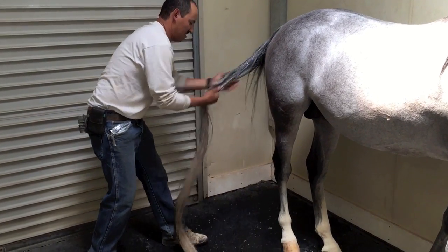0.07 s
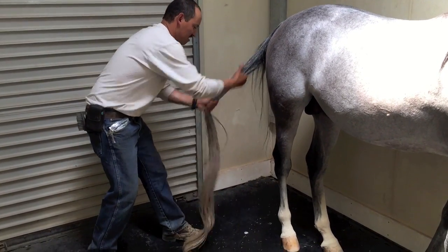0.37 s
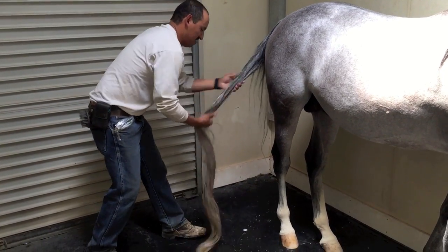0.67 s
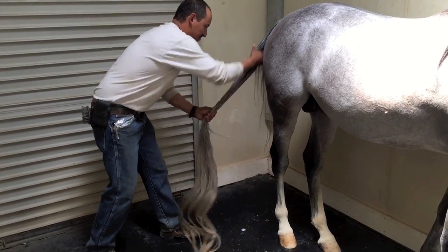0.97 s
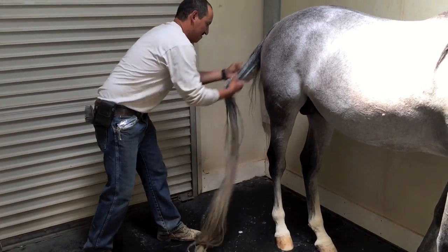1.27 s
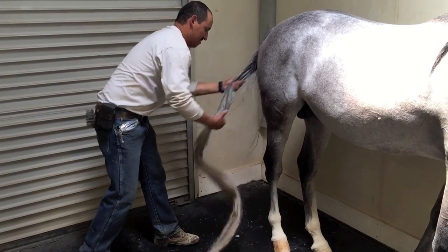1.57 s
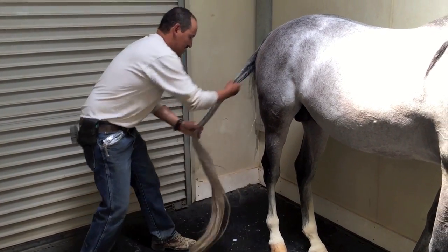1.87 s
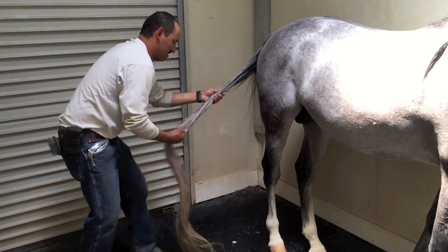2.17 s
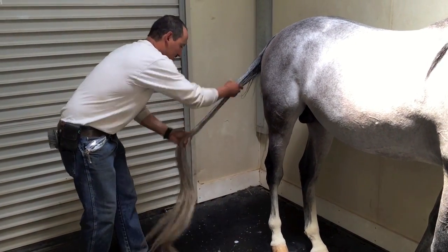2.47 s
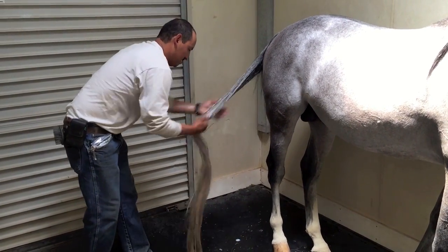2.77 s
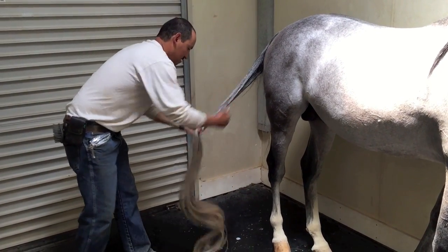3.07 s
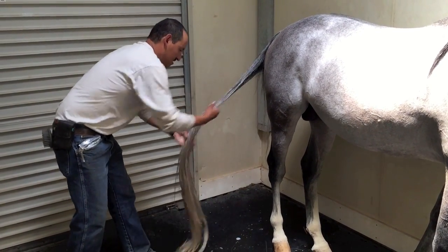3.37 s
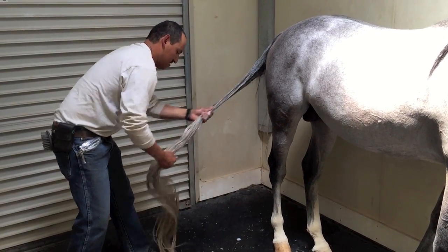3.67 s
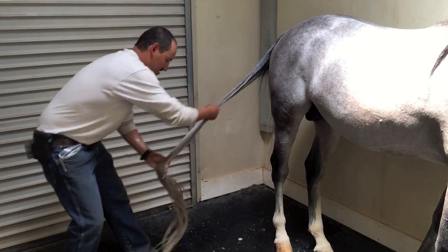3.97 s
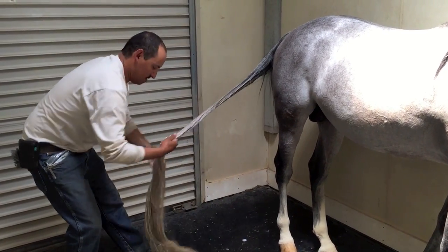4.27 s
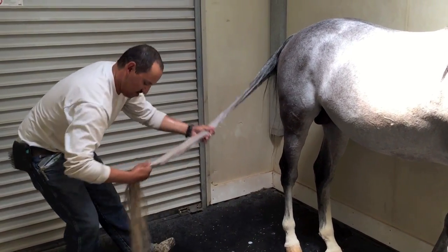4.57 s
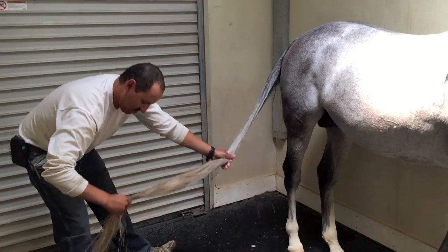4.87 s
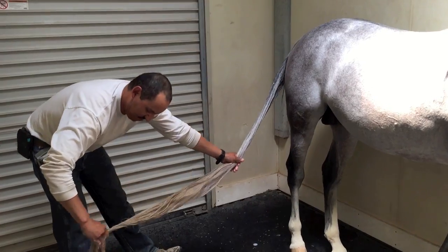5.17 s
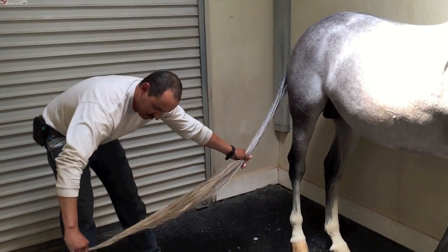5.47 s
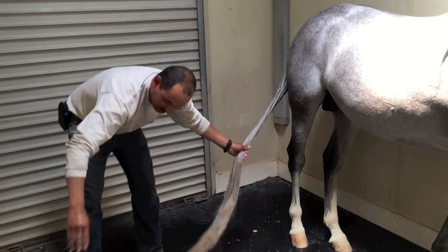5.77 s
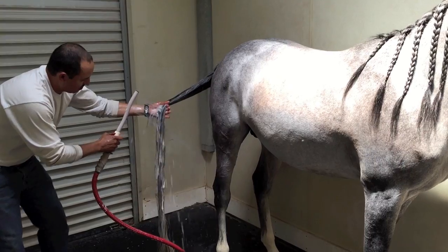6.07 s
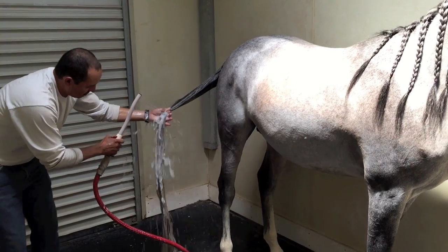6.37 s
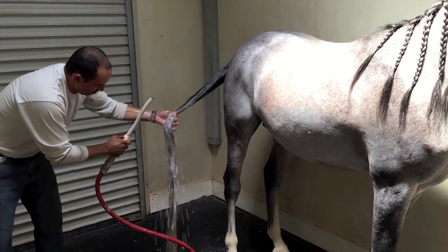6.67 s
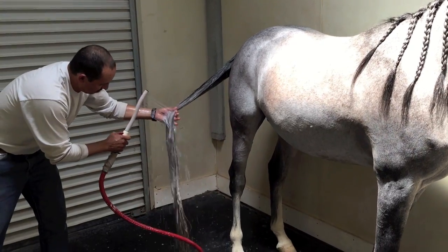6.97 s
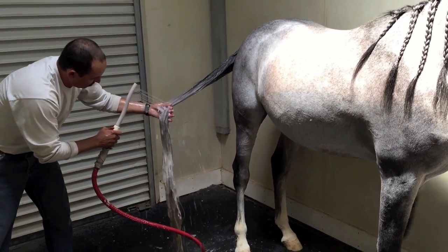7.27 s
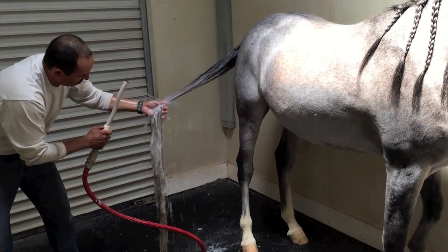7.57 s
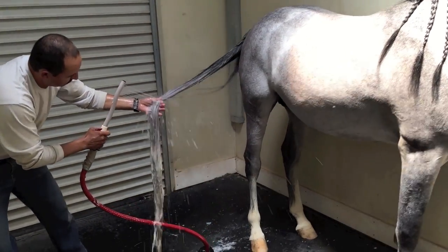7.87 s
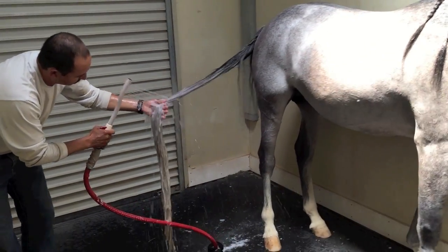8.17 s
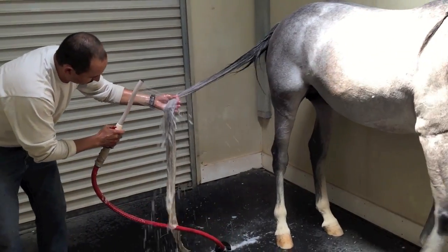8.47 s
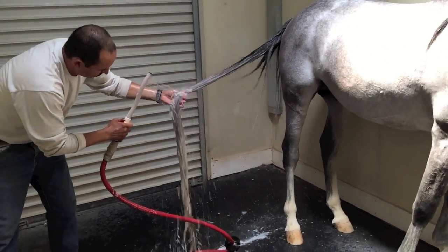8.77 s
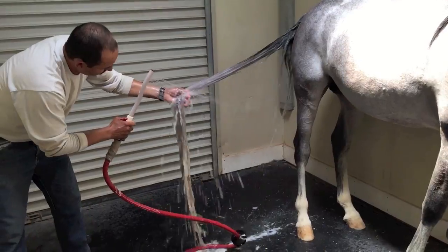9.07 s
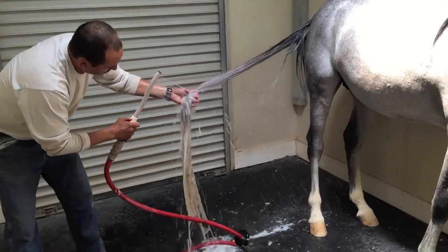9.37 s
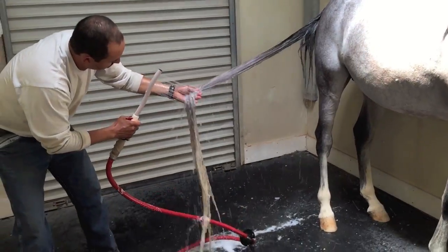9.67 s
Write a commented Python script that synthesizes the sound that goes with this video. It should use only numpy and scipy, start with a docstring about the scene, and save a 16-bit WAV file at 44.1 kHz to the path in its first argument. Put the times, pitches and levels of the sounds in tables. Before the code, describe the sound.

For the first six seconds, hands quietly strip lather down a horse's wet tail in uneven strokes, the hair rubbing and the suds squelching and crackling. Drops plink and tick now and then, most clearly near 0.6 seconds. Short squeaks of wet hair come between 1 and 1.7 seconds and again around 4.6 and 5.7. One stronger rub stands out just after 2 seconds, and suds tick onto the floor from 5 seconds. Soft bumps of shifting feet sit over a faint low barn rumble.

At 6 seconds a hose abruptly takes over, much louder. Spray hisses steadily in the hair while run-off splatters, sloshes in a puddle and drums on a rubber mat, with irregular sharp slaps, thuds and a few gurgles until the end, near 9.7 seconds. The wash stall's hard walls add a short echo; the microphone is a few steps away.

```python
"""Hands strip lather down a horse's wet tail: hair rubs and squeaks, suds squelch, drops plink and tick.
At six seconds a hose takes over: spray hisses in the hair, run-off splatters and drums on a rubber mat.
Drops, squeaks and gouts echo off the hard walls of the wash stall.
Feet and bodies shift over the low rumble of the barn. One microphone, a few steps away."""
import sys
import numpy as np
from scipy import signal
from scipy.fft import rfft, irfft, next_fast_len
from scipy.io import wavfile
from scipy.ndimage import uniform_filter1d, map_coordinates

SR = 44100
rng = np.random.default_rng(int(sys.argv[2]) if len(sys.argv) > 2 else 0)


def materialize(psi):
    """Save the field psi as 16-bit PCM at rate SR to the path in sys.argv[1].

    A 1-D psi becomes a single channel; in a 2-D psi each row is a channel.
    """
    bounded = np.clip(np.atleast_2d(psi).T, -1, 1)
    quanta = np.round(bounded * 32767).astype(np.int16)
    wavfile.write(sys.argv[1], SR, quanta)


N = 428211

# freq_hz, gain_db
HAIR_SPECTRUM = [(1000, -8), (2400, -13), (3600, 2), (5000, 3.5), (6500, 4), (9500, 1), (10400, -3),
                 (12000, -0.5), (15000, -4.5)]
SNAP_SPECTRUM = [(300, -25), (1500, -48), (3500, 27), (8000, -28), (15000, 20)]
SQUELCH_SPECTRUM = [(500, -26), (900, -8), (1400, 8.5), (2000, 7.5), (3000, 7.5), (4500, 2.5), (8000, -28)]
SCUFF_SPECTRUM = [(200, -1), (310, 3.5), (500, 3), (800, 6.5), (1150, 5.5), (1600, -53), (3000, -14)]
# freq_hz, width_hz, gain_db
FLOOR_MODES = [(314, 9.9, 6), (470, 83, 2.5), (600, 51, -2), (750, 14, 2), (1004, 9.9, 0.5)]
STOOP_START_S, STOOP_LENGTH_S = 4.86, 0.23
SUDS_DB, STOOP_SUDS_BOOST_DB = -14, 5


def lathering():
    """Each stroke rubs wet hair, bursts foam and squeezes suds out between the fingers."""
    rub_gain, squelch_gain, scuff_gain = stroke_gains()
    # thin end of the tail, near the floor: duller rub, more crackle, hollow scuff
    stooped = ramp(STOOP_START_S, STOOP_LENGTH_S)
    hair = texture(HAIR_SPECTRUM, 2500, spread_db=4, wash=0.9, ripple_db=2.6, window=512, frames=10)
    suds = coloured(patter(120, spread_db=8, wash=0), SNAP_SPECTRUM)
    rub = hair + amp(SUDS_DB + STOOP_SUDS_BOOST_DB * stooped) * suds
    dull_rub = filtered(rub, lambda hz: 1 / np.sqrt(1 + (hz / 9000) ** 4))
    rub = (1 - stooped) * rub + stooped * dull_rub
    squelch = texture(SQUELCH_SPECTRUM, 900, spread_db=0.5, wash=1, ripple_db=4, window=512, frames=6)
    wet_rub = rub_gain * rub + squelch_gain * squelch
    grit = patter(500, spread_db=4.5, wash=0.88)
    scuff = (1 - stooped) * coloured(grit, SCUFF_SPECTRUM) + stooped * resonant(grit, FLOOR_MODES)
    return amp(1.24 * wobble(45)) * wet_rub + amp(1.4 * wobble(25)) * scuff_gain * scuff


# start_s, length_s, rub_db, squelch_db, scuff_db
STROKES = [(0.08, 0.14, -50.5, -50, -61), (0.33, 0.032, -55, -57, -74), (0.461, 0.038, -56, -50.5, -84),
           (0.555, .2, -43.5, -50.5, -74), (0.833, 0.12, -53.5, -53, -81), (1.052, 0.027, -52, -54, -72),
           (1.154, 0.13, -49.5, -54, -76), (1.333, 0.09, -46.5, -46.5, -59), (1.45, 0.32, -49, -50.5, -81),
           (1.786, 0.62, -43.5, -43.5, -51.5), (2.142, 0.17, -30.5, -42, -57),
           (2.297, 0.29, -50.5, -46.5, -64), (2.634, 0.14, -44.5, -46.5, -59),
           (2.794, 0.21, -50.5, -49, -64), (3.047, 0.22, -48, -45, -58), (3.334, 0.23, -45.5, -47.5, -60),
           (3.59, 0.091, -47.5, -47, -71), (3.782, 0.16, -45.5, -43.5, -54.5),
           (3.974, 0.089, -49.5, -49, -61), (4.083, 0.18, -47, -46.5, -65), (4.27, 0.45, -53.5, -53.5, -65),
           (4.718, 0.27, -52.5, -52.5, -56.5), (5.064, 0.087, -48, -61, -53.5),
           (5.197, 0.031, -43, -52, -46.5), (5.29, 0.045, -48, -56, -65), (5.342, 0.024, -55, -53, -43.5),
           (5.457, 0.043, -55, -77, -56), (5.617, 0.08, -67, -73, -52.5), (5.708, 0.12, -45.5, -60, -44.5),
           (5.882, 0.027, -45.5, -70, -43)]
REST_RUB_DB, REST_SQUELCH_DB, REST_SCUFF_DB = -63.5, -60.5, -65.5
ATTACK_BASE_S, ATTACK_SHARE, SAG_DB_PER_S, RELEASE_S = 0.033, 0.18, 11.5, 0.097


def stroke_gains():
    """Rub, squelch and scuff swell as the grip closes, sag as the hand slows, and fall on release."""
    t = np.arange(N) / SR
    power = np.outer(amp([REST_RUB_DB, REST_SQUELCH_DB, REST_SCUFF_DB]) ** 2, np.ones(N))
    for start_s, length_s, *levels_db in STROKES:
        active = (t > start_s) & (t < start_s + length_s + RELEASE_S)
        age_s = t[active] - start_s
        attack = np.minimum(age_s / (ATTACK_BASE_S + ATTACK_SHARE * length_s), 1)
        release = np.minimum(1 - (age_s - length_s) / RELEASE_S, 1)
        envelope = attack * release * amp(-SAG_DB_PER_S * age_s)
        power[:, active] += np.outer(amp(levels_db), envelope) ** 2
    return np.sqrt(power)


# start_s, level_db, pitch_hz, length_s
SQUEAKS = [(0.905, -51.5, 1586, 0.044), (0.963, -43, 1605, 0.042), (1.11, -52.5, 1540, 0.043),
           (1.231, -48.5, 1573, 0.026), (1.66, -41.5, 1640, 0.041), (3.045, -49, 1515, 0.032),
           (4.637, -48, 1563, 0.045), (4.664, -48, 2000, 0.032), (4.668, -49.5, 2600, 0.029),
           (5.588, -50, 1640, 0.034), (5.738, -44.5, 1610, 0.041)]


def squeaks():
    """Wet hair sticks and slips under the fingers: short, wavering, stuttering chirps."""
    out = np.zeros(N)
    for start_s, level_db, pitch_hz, length_s in SQUEAKS:
        progress = np.arange(SR // 4) / SR / length_s
        noise = rng.standard_normal((2, len(progress)))
        flutter, stutter = unit(uniform_filter1d(noise, size=45, axis=1))
        glide_hz = pitch_hz * (1 + 0.06 * (np.minimum(progress, 1) - 0.5) + 0.055 * flutter)
        grip = np.sqrt(np.clip(np.minimum(25 * progress, 2 * (1 - progress)), 0, 1))
        chirp = np.sin(2 * np.pi * np.cumsum(glide_hz) / SR) * grip * amp(2 * stutter)
        add(out, start_s, amp(level_db + 2) * stall(chirp, wet_db=-10))
    return out


# start_s, level_db, pitch_hz
PLINKS = [(0.189, -41.5, 4170), (0.335, -46, 860), (0.578, -31.5, 3670), (0.874, -43, 3770),
          (0.967, -44.5, 3780), (1.4588, -41, 1700), (2.4738, -42, 4230), (4.8524, -42, 3800),
          (4.9414, -43, 1400)]
LARGE_BUBBLE_HZ, SMALL_BUBBLE_HZ = 1570, 3550


def plinks():
    """Each drop traps a bubble that rings at an unsteady, rising pitch; faint ones fall at random."""
    out, t = np.zeros(N), np.arange(SR // 3) / SR
    when, size, kind, detune = rng.random((24, 4)).T
    faint_hz = np.where(kind < 2 / 3, LARGE_BUBBLE_HZ, SMALL_BUBBLE_HZ) * 2 ** ((detune - 0.5) / 2)
    faint_drops = list(zip(when * HOSE_ON_S, -56 + 10 * size, faint_hz))
    for start_s, level_db, pitch_hz in PLINKS + faint_drops:
        flutter = unit(uniform_filter1d(rng.standard_normal(len(t)), size=60))
        glide_hz = pitch_hz * (1 + 0.08 * (np.minimum(t / 0.016, 1) - 0.5) + 0.03 * flutter)
        ring = np.sin(2 * np.pi * np.cumsum(glide_hz) / SR) * struck(t, attack_s=0.0002, t60_s=0.04)
        add(out, start_s, amp(level_db + 4) * stall(ring, wet_db=-5.5))
    return out


# start_s, tick_db, pitch_hz, knock_db
TICKS = [(0.578, -34, 3780, -75), (2.221, -33, 4100, -62), (2.822, -27, 11000, -49), (5.07, -30, 3220, -53),
         (5.226, -30, 5000, -61), (5.238, -28, 5260, -51), (5.303, -35, 4500, -62), (5.359, -28, 3500, -44),
         (5.512, -41, 5000, -60), (5.9, -47, 4180, -48), (5.919, -30, 7040, -62)]
# centre_s, level_db, pitch_hz, width_s
SQUIRTS = [(0.734, -51, 1340, 0.14), (2.226, -40, 1300, 0.014), (2.302, -40.5, 1100, 0.052),
           (2.837, -54.5, 680, 0.041), (3.913, -49, 810, 0.07), (4.867, -54.5, 1160, 0.065)]


def suds_clots():
    """Suds snap and land with a tick, knock and spatter, or squirt between the fingers."""
    out = np.zeros(N)
    for start_s, tick_db, hz, knock_db in TICKS:
        tick = burst([(hz / 8, -20), (hz * 0.65, -1), (hz * 1.2, 0), (hz * 3, -16)], t60_s=0.0074)
        add(out, start_s, amp(tick_db) * stall(tick, wet_db=0))
        add(out, start_s, amp(knock_db + 2.5) * stall(burst(SCUFF_SPECTRUM, t60_s=0.06), wet_db=-15))
        add(out, start_s, amp(knock_db - 5) * burst(SPLATTER_SPECTRUM, t60_s=0.13))
    return out + sum(swell(*squirt) for squirt in SQUIRTS)


# time_s, spray_db, splatter_db, puddle_db, slosh_db
HOSE_LEVELS = [(6.06, -31.5, -36.5, -36, -40), (6.3, -32.5, -31.5, -38, -42.5),
               (6.58, -27, -36, -34, -34.5), (6.67, -30, -41, -34, -41), (6.73, -27, -27, -34.5, -30.5),
               (6.82, -30.5, -34, -35, -39.5), (6.96, -29, -32.5, -31, -37.5),
               (7.18, -33.5, -31, -40.5, -43.5), (7.45, -29, -30, -36.5, -39.5),
               (7.74, -30, -36.5, -33.5, -40.5), (8.04, -30, -34, -31, -37), (8.26, -28.5, -28, -36, -39),
               (8.36, -31.5, -34.5, -34, -38), (8.49, -30.5, -35.5, -29.5, -40.5),
               (8.62, -30, -35, -34, -40), (8.72, -29, -31, -34, -33), (8.79, -30.5, -42, -32.5, -37),
               (8.87, -29.5, -32, -35, -37.5), (9.1, -30, -32.5, -35.5, -37),
               (9.25, -32, -38.5, -33.5, -40), (9.36, -27.5, -30, -33, -34),
               (9.48, -30.5, -34.5, -32.5, -35), (9.68, -28, -37, -33, -39)]
# freq_hz, gain_db
SPRAY_SPECTRUM = [(1500, -16), (4000, -1.5), (4900, -4), (5500, 0.5), (6700, 0.5), (7700, -2), (9700, -0.5),
                  (10450, -7), (11200, -2), (13000, -2.5), (15500, -5.5)]
SPLATTER_SPECTRUM = [(900, -15), (1700, -3.5), (2300, 2), (3200, 4), (4500, -1), (9000, -13)]
PUDDLE_SPECTRUM = [(600, -45), (1100, -3), (1700, -1.5), (2200, -2.5), (3000, -9), (5000, -29)]
SLOSH_SPECTRUM = [(100, -38), (200, -11), (420, -2.5), (600, -2), (1000, -1.5), (1300, -15), (2500, -45)]
MAT_SPECTRUM = [(200, -16.5), (265, -9.5), (300, 4), (345, 1.5), (400, -8), (500, -29.5)]
# freq_hz, width_hz, gain_db
FIRST_SPOT_MODES = [(683, 47, -5), (1377, 21, 7), (2430, 160, -2.5)]
SECOND_SPOT_MODES = [(718, 23, -5.5), (980, 16, 3.5), (1673, 120, -3.5), (3230, 31, -10)]
HOSE_ON_S, MOVE_START_S, MOVE_LENGTH_S = 5.99, 7.5, 0.66
DRUM_DB, DRUM_RISE_DB_PER_S, CLUMPS_PER_S = -45, 0.66, 55


def hose():
    """Spray hisses in the hair; clumps of run-off splatter, slosh in a puddle and drum on the mat."""
    spray_db, splatter_db, puddle_db, slosh_db = curves(HOSE_LEVELS)
    drum_db = DRUM_DB + DRUM_RISE_DB_PER_S * (np.arange(N) / SR - HOSE_ON_S)
    clumps = wobble(CLUMPS_PER_S)
    spray = texture(SPRAY_SPECTRUM, 4000, spread_db=3, wash=1.1, ripple_db=2.5, window=1024, frames=20)
    splatter = texture(SPLATTER_SPECTRUM, 700, spread_db=4.5, wash=0.6,
                       ripple_db=3.6, window=1024, frames=12)
    puddle = texture(PUDDLE_SPECTRUM, 700, spread_db=4, wash=0.8, ripple_db=4.5, window=2048, frames=8)
    slosh = texture(SLOSH_SPECTRUM, 500, spread_db=3, wash=0.8, ripple_db=4, window=2048, frames=10)
    # the stream wanders to a second spot, where the mat drums lower
    moved = ramp(MOVE_START_S, MOVE_LENGTH_S)
    first, second = np.sqrt(1 - moved), np.sqrt(moved)
    drops = patter(800, spread_db=5, wash=0.49)
    blows = patter(120, spread_db=2, wash=0.54)
    ring = first * resonant(drops, FIRST_SPOT_MODES) + second * resonant(drops, SECOND_SPOT_MODES)
    higher_mat = [(hz * 1.16, db) for hz, db in MAT_SPECTRUM]
    drum = first * coloured(blows, higher_mat) + second * coloured(blows, MAT_SPECTRUM)
    return (amp(spray_db + 1.68 + 0.5 * clumps + 0.27 * wobble(7.9)) * spray
            + amp(splatter_db - 0.6 + 0.46 * clumps + 1.1 * wobble(20)) * splatter
            + amp(puddle_db + 0.21 * clumps) * (amp(0.5) * puddle + amp(-6) * ring)
            + amp(slosh_db + 0.1 + 1.2 * clumps) * slosh
            + amp(drum_db + 0.99 * clumps) * drum)


# start_s, level_db
SLAPS = [(6.5766, -21), (6.736, -14), (7.467, -19), (7.836, -14), (8.2585, -16.5), (8.6255, -15),
         (9.342, -19)]
THUDS = [(6.267, -37), (6.717, -24.5), (6.748, -28.5), (6.785, -33), (7.02, -28), (7.17, -33.5),
         (7.426, -32.5), (7.611, -23), (7.706, -33), (7.856, -30.5), (7.963, -27.5), (8.047, -34),
         (8.317, -30.5), (8.393, -38), (8.672, -27.5), (8.712, -26), (8.766, -34), (8.915, -38),
         (9.013, -26.5), (9.07, -32), (9.174, -35), (9.35, -24.5), (9.414, -30), (9.465, -34),
         (9.55, -29.5), (9.604, -33), (9.66, -34)]
# time_s, pitch_hz
MAT_PITCH = [(7.85, 371), (7.96, 315.8)]
# centre_s, level_db, pitch_hz, width_s
GURGLES = [(6.395, -35.5, 2330, 0.048), (6.483, -37, 2320, 0.028), (6.668, -35, 1630, 0.0251),
           (8.471, -33, 1050, 0.027)]


def gouts():
    """Masses of water slap down and thud on the rubber; air pockets ring in the puddle."""
    out, t = np.zeros(N), np.arange(SR // 3) / SR
    for start_s, level_db in SLAPS:
        slap = burst(SNAP_SPECTRUM, t60_s=0.0052)
        slap += amp(-3) * burst(SPLATTER_SPECTRUM, t60_s=0.062)
        slap += amp(-11.5) * burst(PUDDLE_SPECTRUM, t60_s=0.075)
        add(out, start_s, amp(level_db - 4.5) * stall(slap, wet_db=-4))
    for start_s, level_db in THUDS:
        pitch_hz = np.interp(start_s, *np.transpose(MAT_PITCH)) * rng.normal(1, 0.03)
        thud = np.sin(2 * np.pi * pitch_hz * t) * struck(t, attack_s=0.005, t60_s=0.073)
        thud += amp(-15) * burst(MAT_SPECTRUM, t60_s=0.15)
        thud += amp(-20.5) * burst(SLOSH_SPECTRUM, t60_s=0.048)
        add(out, start_s, amp(level_db + 10.5) * stall(thud, wet_db=-9.5))
    return out + sum(swell(*gurgle, sharpness=18) for gurgle in GURGLES)


# time_s, level_db
RUMBLE_LEVELS = [(0.0, -48.5), (0.35, -55.5), (1.15, -59), (1.4, -50.5), (2.2, -53), (2.65, -54),
                 (4.8, -51), (5.3, -55), (9.7, -61)]
# freq_hz, gain_db
RUMBLE_SPECTRUM = [(25, -42), (40, -8), (53, -10), (64, 4.5), (80, -3.5), (120, -6), (200, -16), (300, -16),
                   (500, -37)]
# centre_s, level_db, pitch_hz, width_s
BUMPS = [(0.857, -55, 194, 0.063), (1.39, -49.5, 142, 0.15), (1.68, -53.5, 194, 0.12),
         (2.143, -49, 161, 0.11), (2.495, -50.5, 235, 0.17), (2.91, -51, 151, 0.21),
         (3.192, -45.5, 175, 0.14), (3.302, -46, 64.6, 0.16), (4.439, -47.5, 160, 0.12),
         (4.695, -50, 163, 0.13), (4.832, -45, 158, 0.071), (5.684, -43.5, 101, 0.1),
         (8.642, -35, 95, 0.035), (8.748, -41, 85, 0.049)]


def barn():
    """Low rumble and drone, with soft bumps from shifting feet, hooves and bodies."""
    rumble_db, = curves(RUMBLE_LEVELS)
    rumble = amp(rumble_db + 1.1 + 1.8 * wobble(9)) * coloured(rng.standard_normal(N), RUMBLE_SPECTRUM)
    drone = amp(-56) * resonant(rng.standard_normal(N), [(92, 4, 3.5), (118, 19, -7.5)])
    return rumble + drone + sum(swell(*bump) for bump in BUMPS)


# freq_hz, t60_s
STALL_DECAY = [(100, 0.16), (500, 0.39), (2000, 0.41), (6000, 0.059), (15000, 0.06)]


def stall(x, wet_db):
    """Direct sound plus wall reverberation, which dies sooner in the treble."""
    hz, t, bins = signal.stft(rng.standard_normal(SR // 2), SR, nperseg=256)
    decay = amp(-60 * t / along(STALL_DECAY, hz)[:, None])
    tail = signal.istft(bins * decay, SR, nperseg=256)[1]
    tail = np.pad(tail / np.linalg.norm(tail), (SR // 250, 0))  # 4 ms pre-delay
    echo = signal.fftconvolve(x, tail)[:len(x)]
    return (x + amp(wet_db) * echo) / np.sqrt(1 + amp(wet_db) ** 2)


def texture(spectrum, hits_per_s, spread_db, wash, ripple_db, window, frames):
    """Coloured patter with narrow peaks and dips that drift at random, giving a watery shimmer."""
    bins = signal.stft(coloured(patter(hits_per_s, spread_db, wash), spectrum), nperseg=window)[2]
    ripple = uniform_filter1d(rng.standard_normal(bins.shape), size=2, axis=0)
    ripple = unit(uniform_filter1d(ripple, size=frames, axis=1))
    bins = bins * amp(ripple_db * np.minimum(ripple, 2))
    return unit(signal.istft(bins, nperseg=window)[1][:N])


def patter(hits_per_s, spread_db, wash):
    """Tiny impacts of uneven size on a wash of unresolved ones."""
    hits = (rng.random(N) < hits_per_s / SR) * rng.choice([-1, 1], N)
    size = amp(spread_db * np.minimum(rng.standard_normal(N), 2))
    return unit(unit(hits * size) + wash * rng.standard_normal(N))


def burst(spectrum, t60_s):
    """Decaying splash of noise."""
    t = np.arange(SR // 3) / SR
    return coloured(rng.standard_normal(len(t)), spectrum) * amp(-60 * t / t60_s)


def swell(centre_s, level_db, pitch_hz, width_s, sharpness=2.57):
    """Soft rise and fall of noise about one pitch."""
    out, envelope = np.zeros(N), np.hanning(int(2 * width_s * SR))
    band = lambda hz: 1 / (1 + (sharpness * np.log((hz + 1) / pitch_hz)) ** 4)
    noise = unit(filtered(rng.standard_normal(len(envelope)), band))
    add(out, centre_s - width_s, amp(level_db + 1) * envelope * noise)
    return out


def struck(t, attack_s, t60_s):
    """Envelope: fast rise, exponential decay."""
    return amp(-60 * t / t60_s) * (1 - np.exp(-t / attack_s))


def resonant(x, modes):
    """x through (freq_hz, width_hz, gain_db) modes and a low-pass, at rms 1."""
    peaks = lambda f: sum(amp(db) * 1j * f * width / (hz * hz - f * f + 1j * f * width)
                          for hz, width, db in modes)
    cutoff_hz = 2 * max(hz for hz, _, _ in modes)
    return unit(filtered(x, lambda f: peaks(f) / (1 + (f / cutoff_hz) ** 2)))


def coloured(x, spectrum):
    """x shaped by a spectrum, at rms 1."""
    return unit(filtered(x, lambda hz: amp(along(spectrum, hz))))


def filtered(x, response):
    """Apply a frequency response."""
    size = next_fast_len(len(x) + 8192)
    return irfft(rfft(x, size) * response(np.fft.rfftfreq(size, 1 / SR)), size)[:len(x)]


def along(points, hz):
    """Interpolate (freq_hz, value) points on a log axis."""
    freqs_hz, values = np.transpose(points)
    return np.interp(np.log(hz + 1), np.log(freqs_hz), values)


def curves(rows):
    """Per-sample curve for each column after time_s."""
    times_s, *columns = np.transpose(rows)
    return [np.interp(np.arange(N) / SR, times_s, column) for column in columns]


def ramp(start_s, length_s):
    """Linear rise from 0 to 1."""
    return np.clip((np.arange(N) / SR - start_s) / length_s, 0, 1)


def wobble(knots_per_s):
    """Smooth random curve."""
    knots = np.clip(rng.standard_normal(4096), -2, 2)
    return map_coordinates(knots, [np.arange(N) * knots_per_s / SR], mode="wrap")


def add(track, start_s, sound):
    """Mix a sound into a track."""
    part = track[max(round(start_s * SR), 0):][:len(sound)]
    part += sound[:len(part)]


def amp(db):
    """Decibels to gain."""
    return 10 ** (np.asarray(db) / 20)


def unit(x):
    """Scale to rms 1."""
    return x / np.sqrt(np.mean(x ** 2) + 1e-20)


def scene():
    """Lathering gives way at once to rinsing; same signal on both channels."""
    rinsing = ramp(HOSE_ON_S, length_s=0.06)
    washing = (1 - rinsing) * lathering() + squeaks() + plinks() + suds_clots()
    mono = washing + rinsing * hose() + gouts() + barn()
    return np.array([mono, mono])


LOW_CUT_HZ, BAND_LIMIT_HZ = 46.0, 15400


def record(dry):
    """Microphone bass roll-off and a hard treble limit."""
    response = lambda hz: (hz < BAND_LIMIT_HZ) * hz ** 4 / np.sqrt(hz ** 8 + LOW_CUT_HZ ** 8)
    return np.array([filtered(channel, response) for channel in dry])


dry = scene()
out = record(dry)
materialize(out)
```